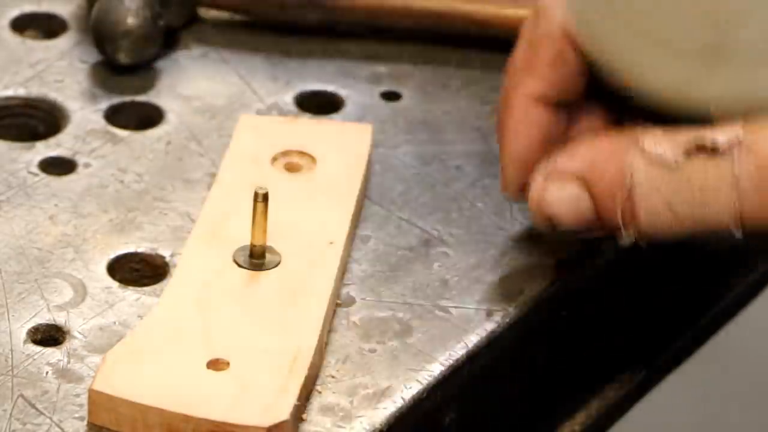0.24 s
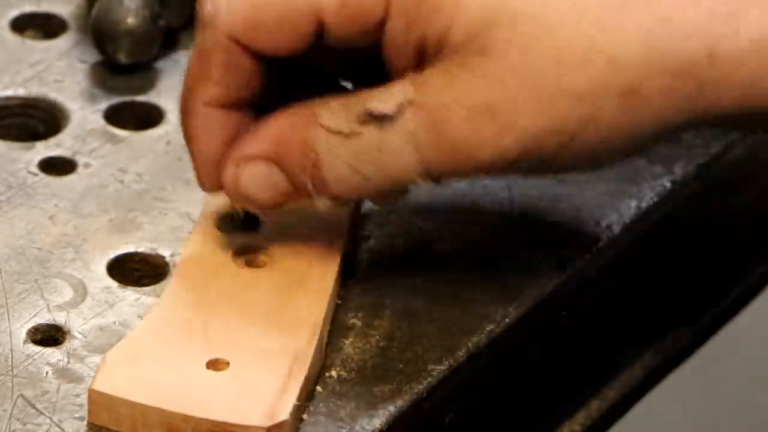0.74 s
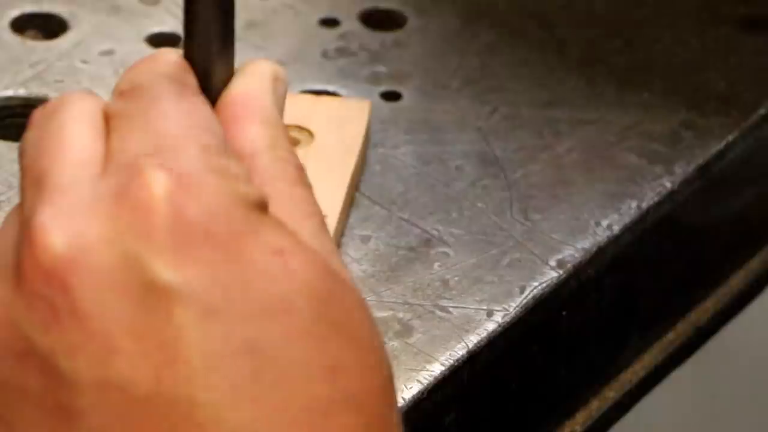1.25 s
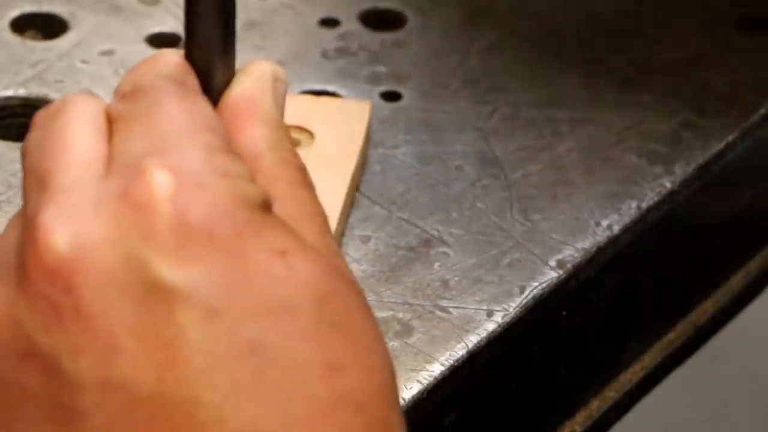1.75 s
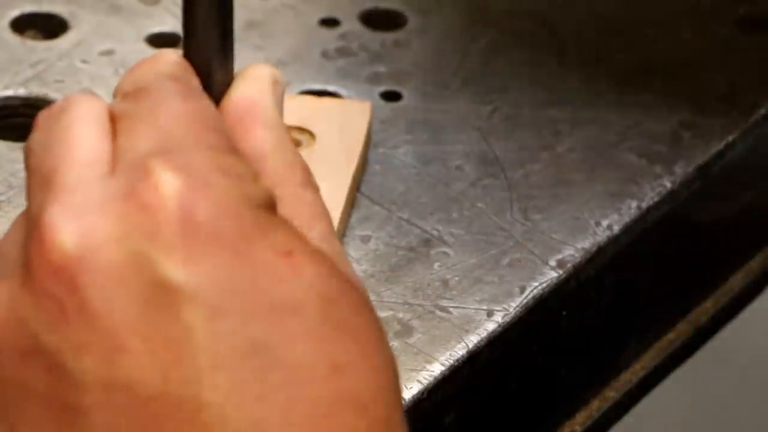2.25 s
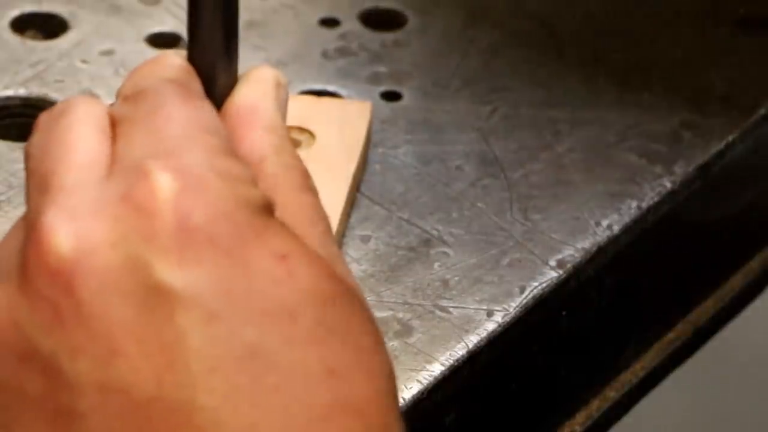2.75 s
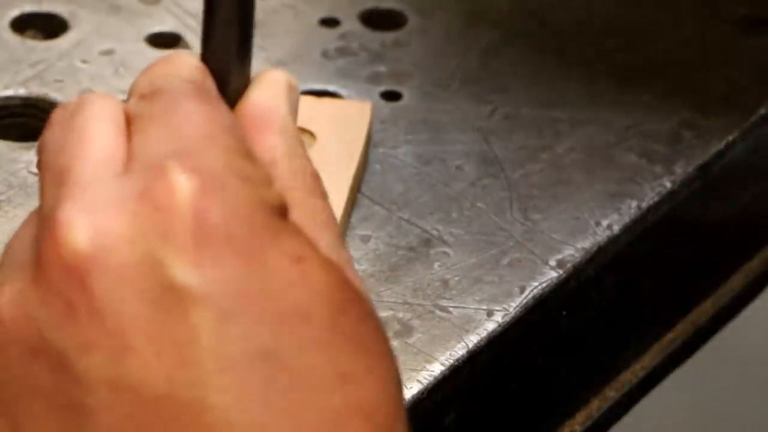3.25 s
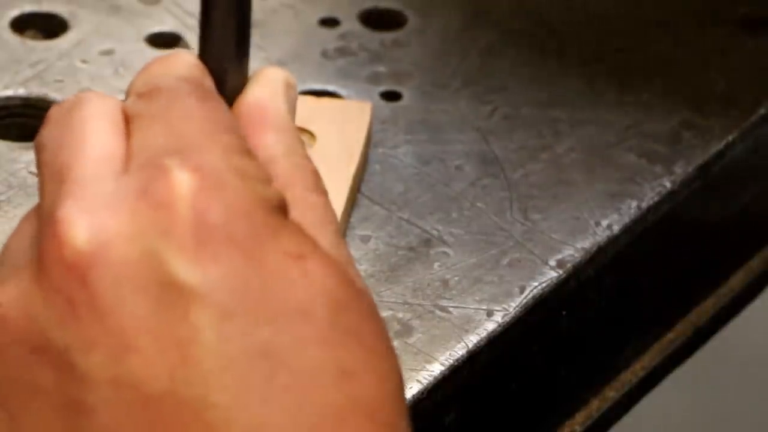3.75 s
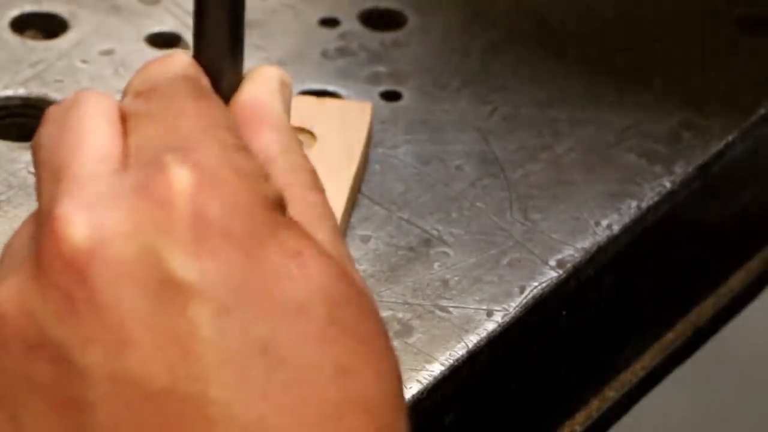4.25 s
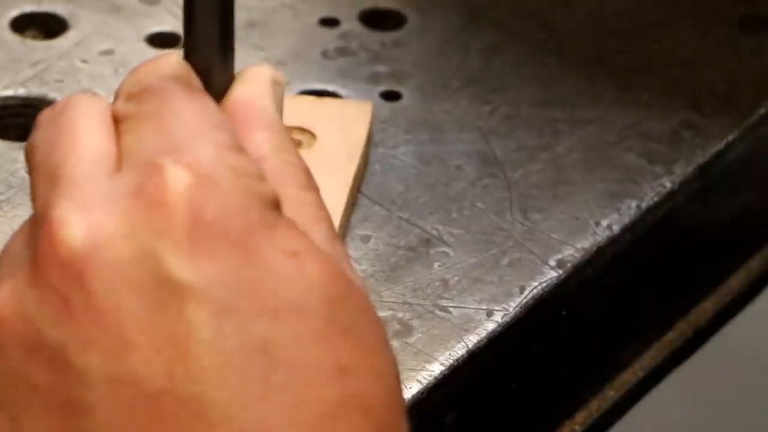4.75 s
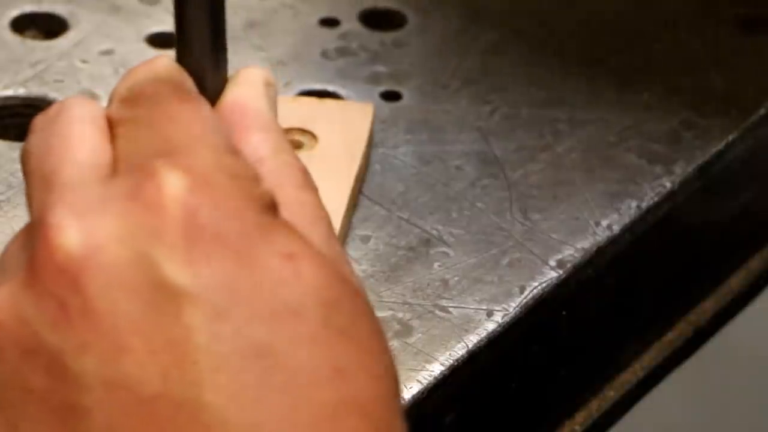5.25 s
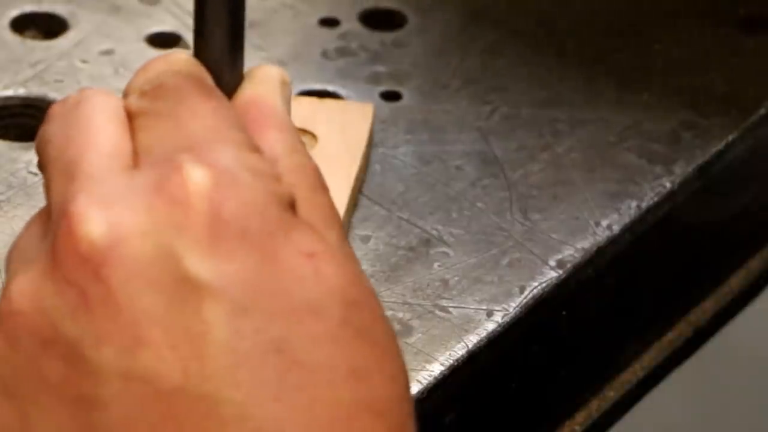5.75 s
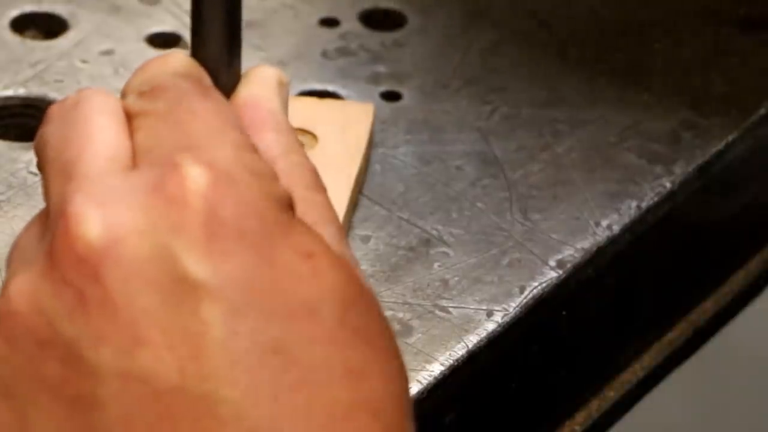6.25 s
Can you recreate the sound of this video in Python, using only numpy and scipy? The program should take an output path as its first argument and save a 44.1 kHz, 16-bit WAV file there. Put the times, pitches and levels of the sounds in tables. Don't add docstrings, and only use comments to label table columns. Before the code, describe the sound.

Small metal ticks and a faint wooden scuff, then six piercing steel hammer strikes on a thick bench plate, with fan rumble underneath.

```python
import sys
import numpy as np
from scipy import signal
from scipy.io import wavfile

SR = 44100
rng = np.random.default_rng(int(sys.argv[2]) if len(sys.argv) > 2 else 0)


def volts(x):
    e = np.asarray(x, float) / 20
    return 10 ** e


def store_pcm(level_fs):
    pcm = np.round(np.clip(level_fs, -1, 1) * 32767).astype(np.int16)
    wavfile.write(sys.argv[1], SR, np.atleast_2d(pcm).T)


N = 286209


def at_hz(points, hz):
    point_hz, value = np.transpose(points)
    return np.interp(np.log(hz), np.log(point_hz), value)


def noise_bands(size):
    white = rng.standard_normal((2, size))
    edges_hz = 22 * 2 ** np.arange(0, 9.7, 1 / 3)
    for k, (low, high) in enumerate(zip(edges_hz, edges_hz[1:])):
        band_pass = signal.butter(2, [low, high], "band", fs=SR, output="sos")
        yield np.sqrt(low * high), signal.sosfilt(band_pass, white[k % 2])


def ring(force, hz, t60):
    r, w = volts(-60 / (t60 * SR)), 2 * np.pi * hz / SR
    return signal.lfilter([0, np.sin(w)], [1, -2 * r * np.cos(w), r * r], force + 1e-18)


def soften(x, cut_hz):
    r = np.exp(-2 * np.pi * cut_hz / SR)
    return signal.lfilter([(1 - r) ** 2], [1, -2 * r, r * r], x)


def lift(x, hz, width_hz, db):
    r = np.exp(-np.pi * width_hz / SR)
    poles = [1, -2 * r * np.cos(2 * np.pi * hz / SR), r * r]
    resonance = signal.lfilter((1 - r * r) / 2 * np.array([1, 0, -1]), poles, x)
    return x + (volts(db) - 1) * resonance


def add(track, sound, s):
    at = round(s * SR)
    track[at:at + len(sound)] += sound[:N - at]


# (frequency [Hz], level per Hz [dB])
DRONE_SPECTRUM = [(25, -3.5), (90, -11), (135, -1), (240, -2), (345, -5.5), (430, -10.5), (760, -6.5),
                  (1000, -14), (1450, -12), (2100, -19.5), (2800, -24.5), (4500, -29), (9000, -25),
                  (15800, -31)]


def drone(drone_db=-37.5):
    out = sum(volts(at_hz(DRONE_SPECTRUM, hz)) * band for hz, band in noise_bands(N))
    return volts(drone_db - 0.5) * out / out.std()


def handle_slide(from_s=0.84, to_s=1.2, slide_db=-48.5):
    part = np.clip((np.arange(N) / SR - from_s) / (to_s - from_s), 0, 1)
    swell = np.sqrt(np.abs(np.sin(np.pi * part)))
    band_pass = signal.butter(1, [2600, 9500], "band", fs=SR, output="sos")
    return volts(slide_db) * swell * signal.sosfilt(band_pass, rng.standard_normal(N))


# (time [s], peak level [dB], pitch [Hz], t60 [s])
TOUCHES = [
    (.897, -36, 3800, 0.0032),
    (.908, -39, 3400, .004),
    (1, -33.5, 1450, 0.0065),
    (1.114, -35, 8140, 0.0063),
    (1.113, -27.5, 4500, .0015),
    (1.116, -33, 3300, 0.004),
    (1.114, -41, 10400, .003),
    (1.135, -36.5, 1700, 0.022),
    (1.862, -34, 1950, 0.0043),
]


def ticks():
    out, t = np.zeros(N), np.arange(SR // 10) / SR
    for s, db, hz, t60 in TOUCHES:
        scrape = rng.standard_normal(len(t)) * volts(-60 * t / 0.0093)
        add(out, volts(db - 3.5) * ring(scrape, hz, t60), s)
    return out


# (frequency [Hz], level [dB])
ROOM_SPECTRUM = [(150, -33.5), (600, -27), (1000, -15), (1500, -17), (3000, -20), (8000, -23),
                 (12000, -23.5), (15000, -32)]
# (frequency [Hz], t60 [s])
ROOM_DECAY = [(200, 0.71), (700, 0.26), (1500, 0.33), (3000, 0.5), (6000, 0.6), (10000, 0.55),
              (15000, 0.23)]


def workshop(x, build_s=0.0021):
    t = np.arange(SR) / SR
    tail = np.zeros(SR)
    for hz, band in noise_bands(SR):
        tail += volts(at_hz(ROOM_SPECTRUM, hz) - 60 * t / at_hz(ROOM_DECAY, hz)) * band
    build_up = 1 - np.exp(-t / build_s)
    return signal.fftconvolve(x, volts(-20.5) * tail * build_up)[:N]


PLATE_MODE_HZ = [245, 345, 569, 640, 692, 780, 867, 927, 974, 1316, 1540, 2078, 2166, 2228, 2417, 2798,
                 2903, 3010, 3245, 3591, 3741, 4920]
# (level [dB], t60 [s])
PLATE_MODES = [(-33.5, 0.32), (-23, 0.086), (5.5, 0.039), (-10.5, 0.019), (-19.5, 0.25), (0, 0.048),
               (-2, 0.12), (-10, 0.22), (-9.5, 0.13), (-6.5, 0.095), (-7, 0.057), (-17, 0.18), (-22, 0.24),
               (-9, 0.064), (-6.5, 0.082), (-10, 0.13), (-7.5, 0.076), (-14, 0.14), (-4.5, 0.03),
               (-11.5, 0.15), (-20, 0.18), (2, 0.031)]


def plate(plate_lag_s=0.003, thud_db=-46):
    t = np.arange(SR // 2) / SR
    shock = np.exp(-((t - plate_lag_s) / 0.00006) ** 2)
    shock = shock / shock.sum()
    spread_db = rng.normal(0, 2.3, len(PLATE_MODES))
    signs = (-1) ** np.arange(len(PLATE_MODES))
    rings = np.zeros(len(t))
    for hz, (db, t60), own_db, sign in zip(PLATE_MODE_HZ, PLATE_MODES, spread_db, signs):
        rings += sign * volts(db + own_db) * ring(shock, hz, t60)
    legs = ring(shock, 70, 0.031)
    return rings + volts(thud_db) * legs


# (frequency [Hz], level per Hz [dB])
CRACK_SPECTRUM = [(180, -29), (300, -20), (2230, -1), (3860, 0.5), (6900, -6.5), (8290, 2), (12100, -3.5),
                  (15800, -2)]


def crack(crack_db=4, crack_t60=0.053):
    t = np.arange(SR // 12) / SR
    burst = np.zeros(len(t))
    for hz, band in noise_bands(len(t)):
        if hz > 200:
            decay_db = 60 * t / crack_t60 * (hz / 4000) ** 0.42
            burst += volts(at_hz(CRACK_SPECTRUM, hz) - decay_db) * band
    lingering_rattle = volts(-27.0 + 45 * np.minimum(t, 0.03) / crack_t60)
    return volts(crack_db + 2) * burst * (1 + lingering_rattle)


# (frequency [Hz], width [Hz])
PUNCH_MODES = [(3450, 800), (4080, 250), (5930, 300), (7400, 500), (8050, 500), (9380, 200)]


def punch_colour(x, face_hz, face_db, punch_db):
    x = lift(x, face_hz, 450, face_db)
    x = lift(x, 1.052 * face_hz, 1830, -0.6 * face_db)
    x = lift(x, 0.88 * face_hz, 790, -0.4 * face_db)
    for (hz, width_hz), db in zip(PUNCH_MODES, punch_db):
        x = lift(x, hz, width_hz, db)
    return x


# (time [s], level [dB])
REBOUNDS = [
    (1.3899, -8.5),
    (2.3077, -8),
    (4.2255, -8.5),
]


def bounces():
    out = np.zeros(N)
    for s, db in REBOUNDS:
        rebound = punch_colour(crack(crack_t60=0.029), 11000, 7.8, (-5, -2, 4, -10, 5, -1))
        add(out, volts(db + 17.5) * soften(rebound, 9000), s)
    return out


# (for an average blow [dB], more for a square one [dB])
PUNCH_LIFTS = [(4, 2.5), (1, -5), (7.5, 2), (-2.5, -2), (5.5, 1.5), (5, -3.5)]


def blow(face_hz, face_db, square, snap_db=21):
    punch_db = [usual_db + square * more_db for usual_db, more_db in PUNCH_LIFTS]
    click = volts(snap_db) * (np.arange(SR // 12) == 0) + 1e-18
    snap = punch_colour(click, face_hz, face_db, punch_db)
    close_crack = punch_colour(crack(), face_hz, face_db, punch_db)
    plate_db = -0.1 + 2 * square
    return snap, close_crack, volts(plate_db - 4.5) * plate()


# (time [s], peak level [dB], face ring [Hz], face lift [dB], squareness [-1 glancing to 1 square])
HAMMER_BLOWS = [
    (1.347, 21, 11600, 6, -0.17),
    (2.275, 22.5, 10950, 2, 0.15),
    (3.2463, 20.5, 11570, 12.5, 1),
    (4.1916, 21.5, 11940, 12.5, -0.3),
    (5.2174, 20.5, 12240, 10.5, -1.46),
    (6.1372, 20.5, 10400, 6.5, 0.21),
]


def blows():
    tracks = np.zeros((3, N))
    for s, db, face_hz, face_db, square in HAMMER_BLOWS:
        for track, part in zip(tracks, blow(face_hz, face_db, square)):
            add(track, volts(db) * part, s)
    return tracks


def scene(plate_room_db=-7):
    snaps, cracks, rings = blows()
    snaps = snaps + ticks()
    near = cracks + bounces() + volts(-4) * snaps + rings
    room = workshop(snaps + volts(plate_room_db) * rings)
    return np.tile(near + room + drone() + handle_slide(), (2, 1))


# (time [s], level [dB])
LOW_JOLTS = [
    (1.347, -21),
    (3.247, -22),
    (5.2174, -28),
    (6.1376, -32),
]


def jolts(jolt_s=0.0075):
    out = np.zeros(N)
    for s, db in LOW_JOLTS:
        add(out, volts(db) * np.hanning(round(jolt_s * SR)), s)
    return out


def gain_control_db(duck_db=25.5, attack_s=0.0053):
    t, gain_db = np.arange(N) / SR, np.zeros(N)
    for s, db, *_, square in HAMMER_BLOWS:
        back_s = 0.2 + 0.0036 * (db - 21) + 0.0097 * square
        since = np.maximum(t - s, 0)
        gain_db -= duck_db * (1 - np.exp(-since / attack_s)) * np.clip(1 - since / back_s, 0, 1)
    return gain_db


def starved_treble(x, cut_hz=2200, smear_s=0.0035, least_s=0.008):
    frame_s, first_frame_s = 1024 / 48000, 0.020
    t = np.arange(N) / SR
    starved, smear = np.zeros(N, bool), np.zeros(N)
    for s, *_ in HAMMER_BLOWS:
        lead_s = (s - first_frame_s) % frame_s
        if lead_s > least_s:
            starved |= (t > s - lead_s) & (t < s - smear_s)
        smear += np.clip(1 - (s - t) / smear_s, 0, 1) * (t < s)
    dull = signal.sosfiltfilt(signal.butter(10, cut_hz, fs=SR, output="sos"), x * starved)
    return np.where(starved, dull, x) + volts(-28) * smear * rng.standard_normal(N)


def band_limit(x):
    return signal.sosfilt(signal.butter(12, 15980, fs=SR, output="sos"), x)


def record(dry, bass_hz=400, bass_share=0.54, offset=0.006, low_cut_hz=110):
    gain_db = gain_control_db()
    bass = soften(dry, bass_hz)
    ducked = (dry - bass) * volts(gain_db) + bass * volts(bass_share * gain_db)
    x = np.clip(ducked, -0.98, 0.98)
    x = signal.sosfilt(signal.butter(1, low_cut_hz, "high", fs=SR, output="sos"), x)
    push = offset * (volts(gain_db) - 1) + jolts()
    x = x + signal.sosfilt(signal.butter(2, 22, "high", fs=SR, output="sos"), push)
    x = signal.sosfilt(signal.cheby2(20, 50, 15980, fs=SR, output="sos"), starved_treble(x))
    return band_limit(np.clip(x, -1, 1))


dry = scene()
out = record(dry)
store_pcm(out)
```